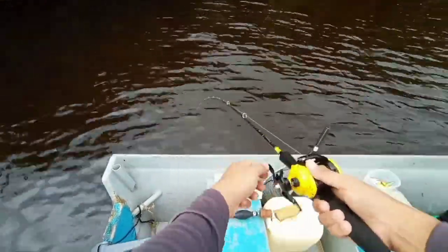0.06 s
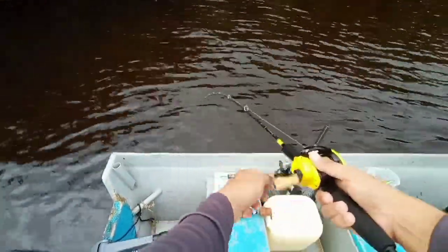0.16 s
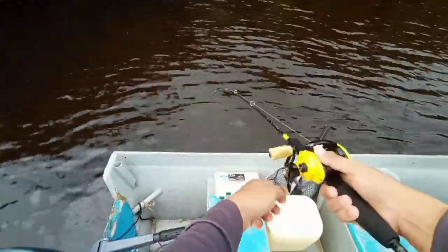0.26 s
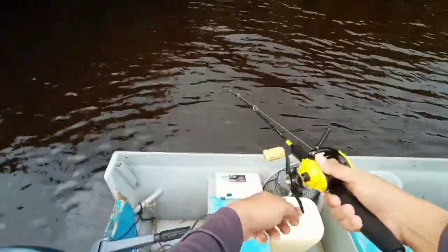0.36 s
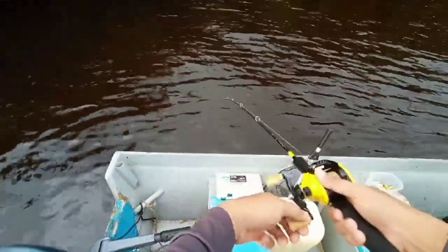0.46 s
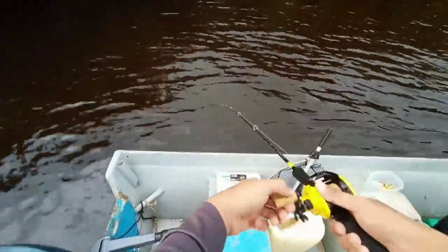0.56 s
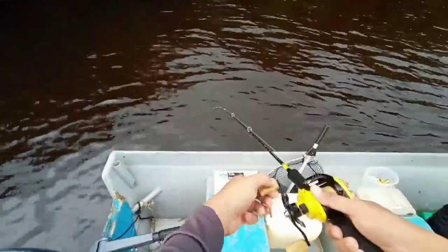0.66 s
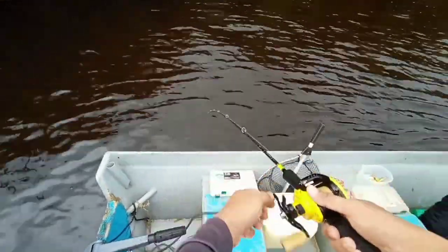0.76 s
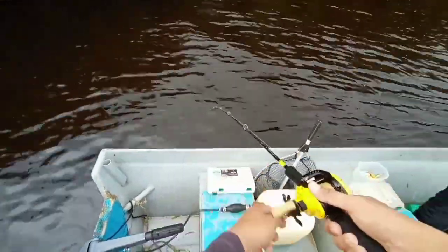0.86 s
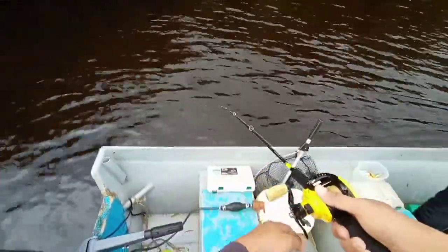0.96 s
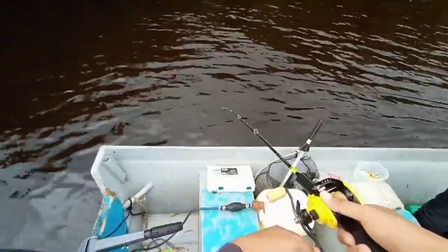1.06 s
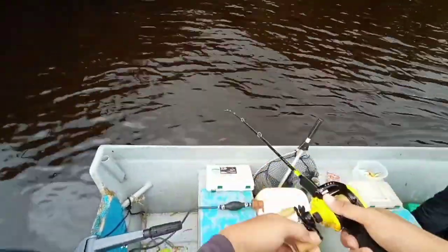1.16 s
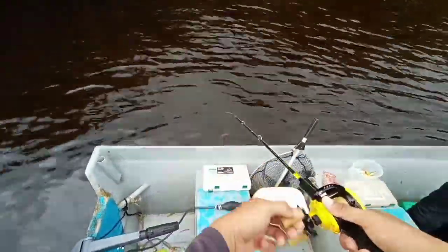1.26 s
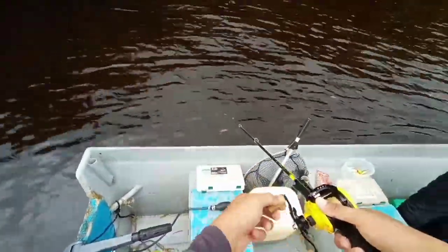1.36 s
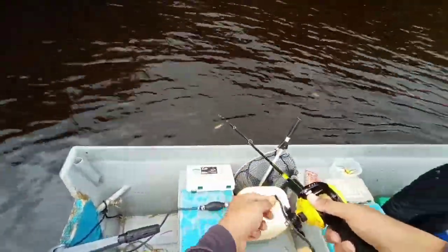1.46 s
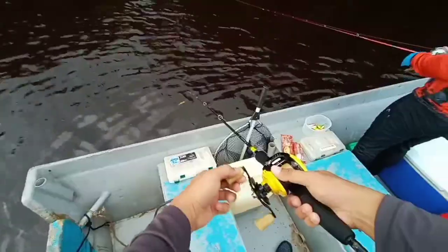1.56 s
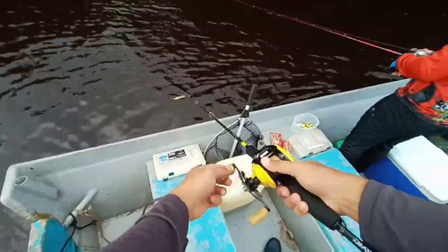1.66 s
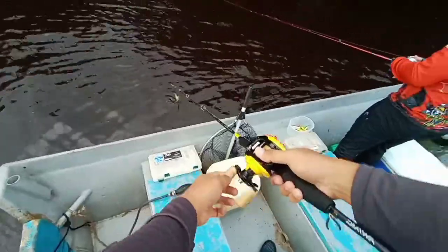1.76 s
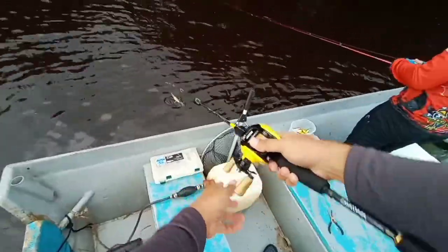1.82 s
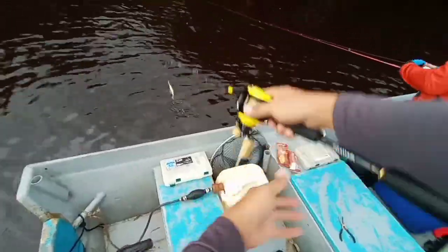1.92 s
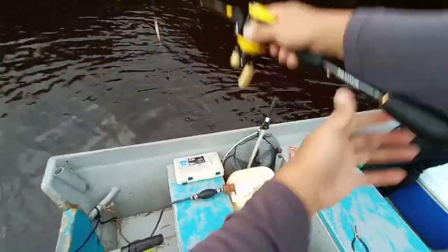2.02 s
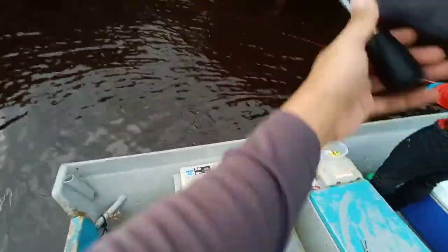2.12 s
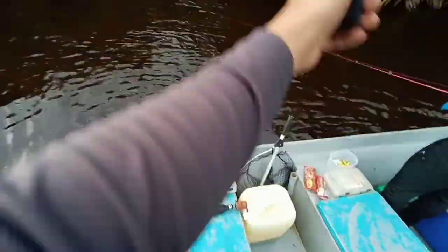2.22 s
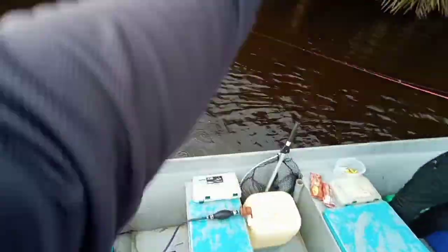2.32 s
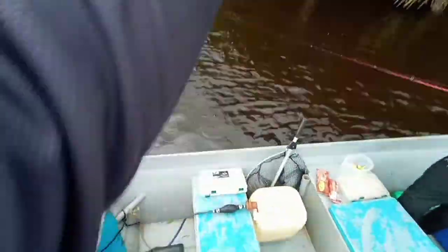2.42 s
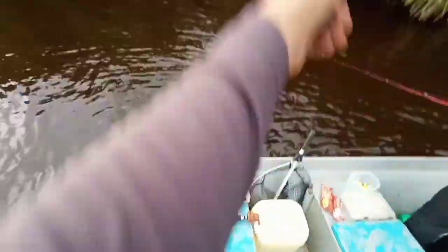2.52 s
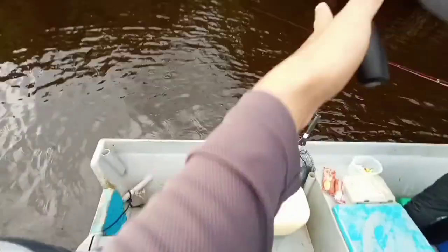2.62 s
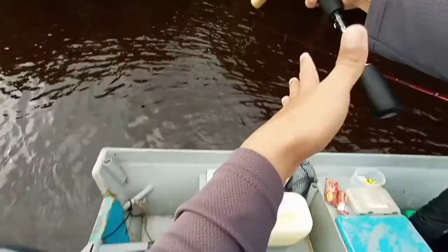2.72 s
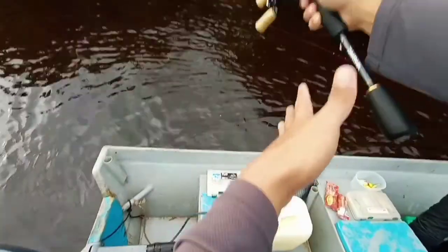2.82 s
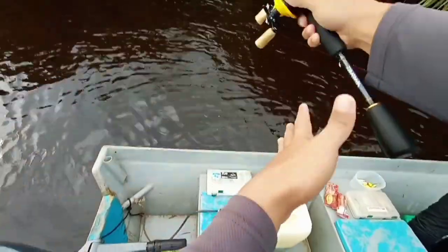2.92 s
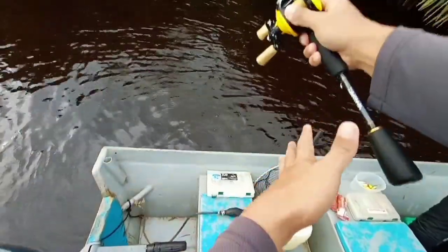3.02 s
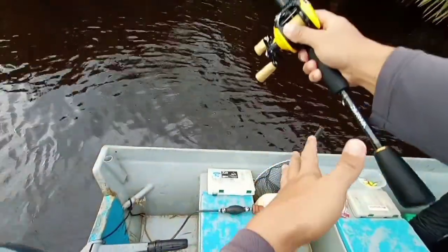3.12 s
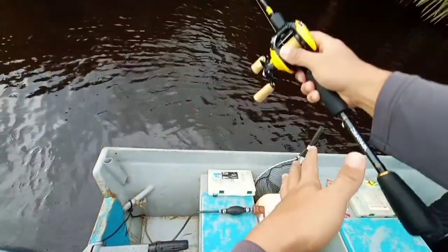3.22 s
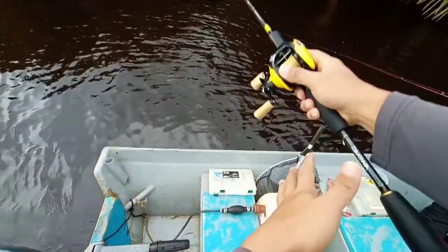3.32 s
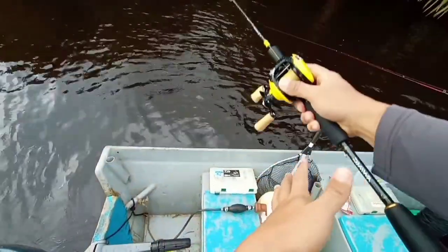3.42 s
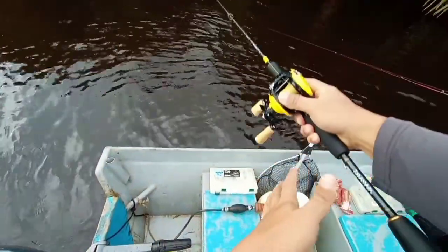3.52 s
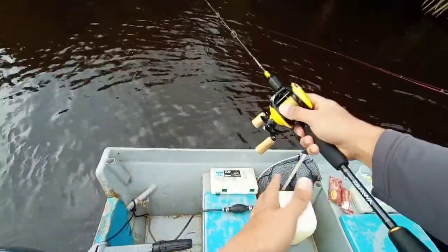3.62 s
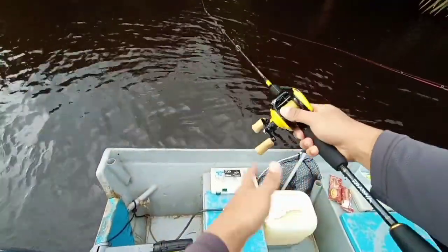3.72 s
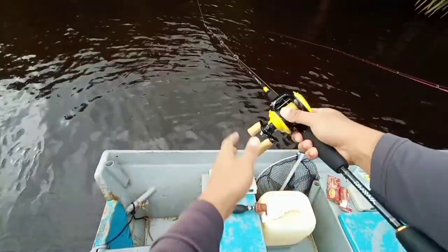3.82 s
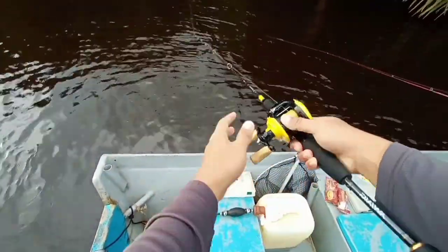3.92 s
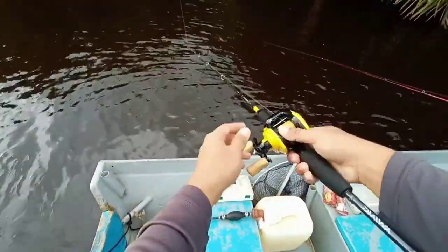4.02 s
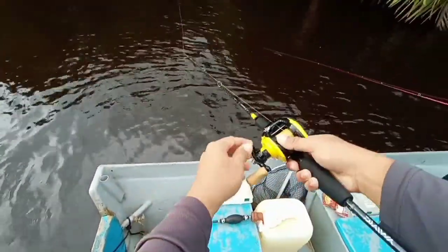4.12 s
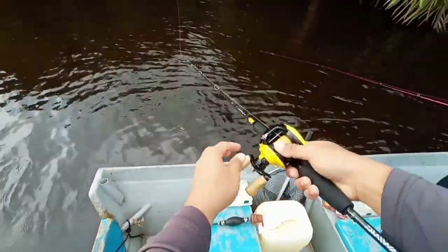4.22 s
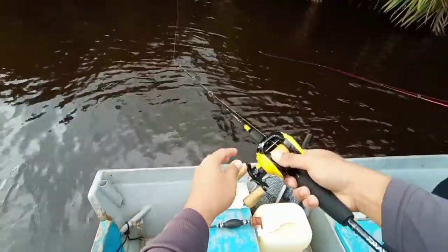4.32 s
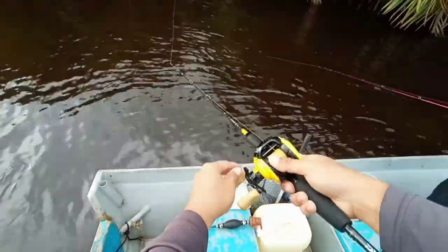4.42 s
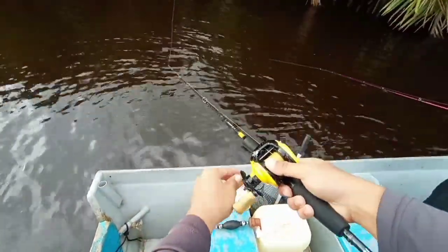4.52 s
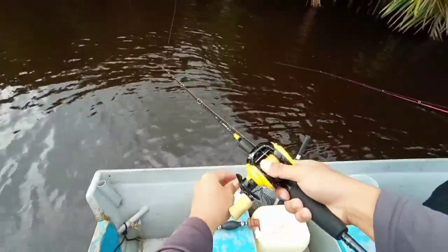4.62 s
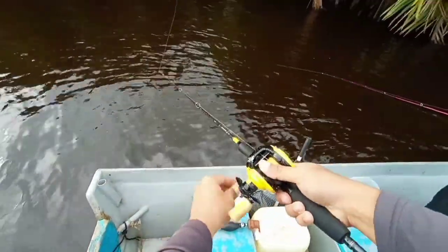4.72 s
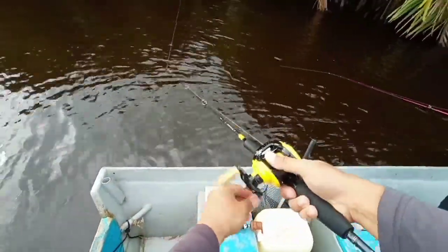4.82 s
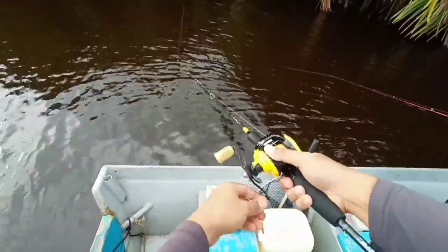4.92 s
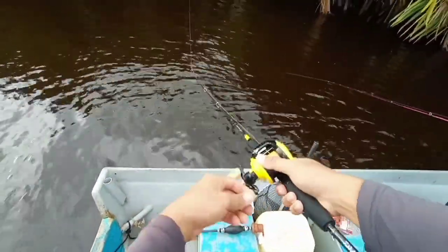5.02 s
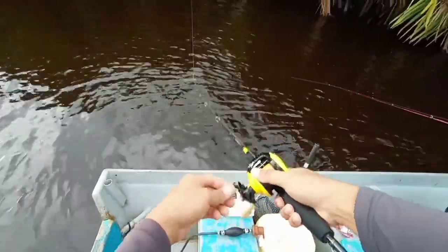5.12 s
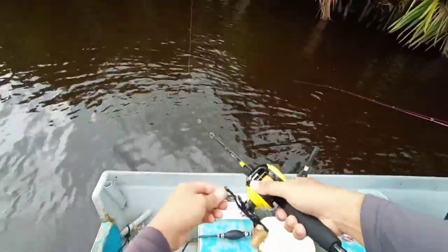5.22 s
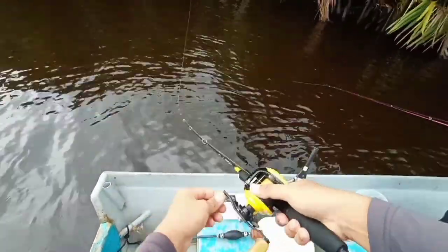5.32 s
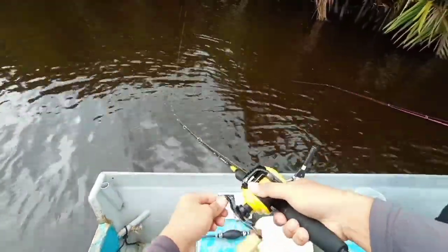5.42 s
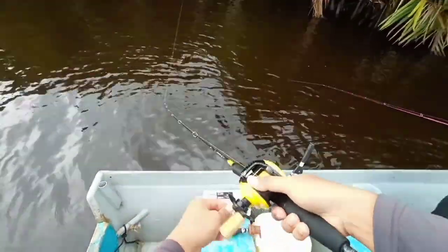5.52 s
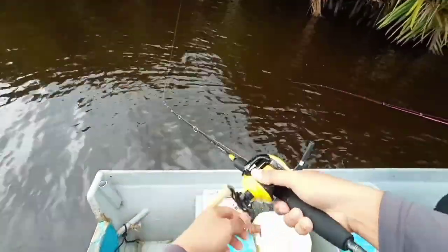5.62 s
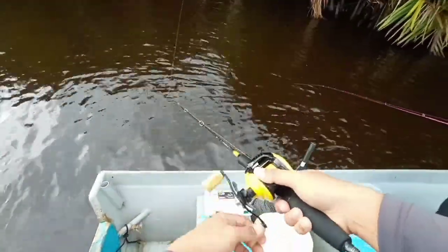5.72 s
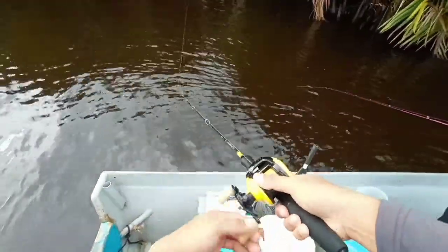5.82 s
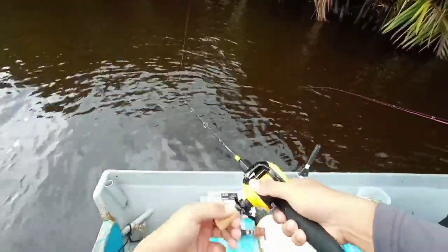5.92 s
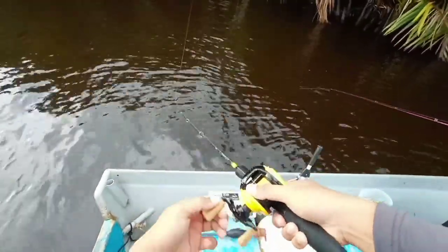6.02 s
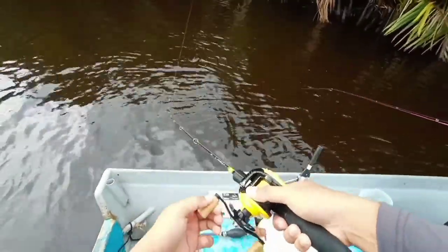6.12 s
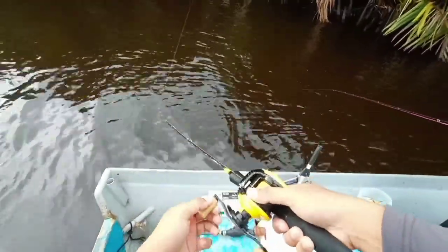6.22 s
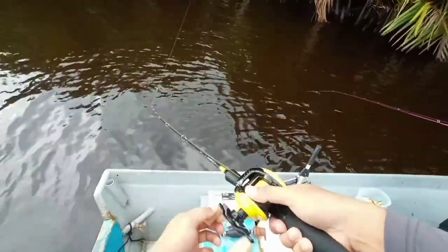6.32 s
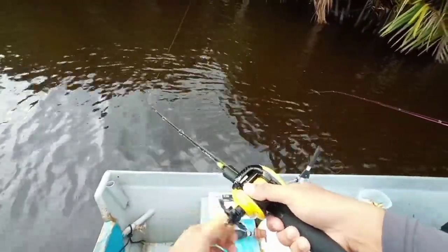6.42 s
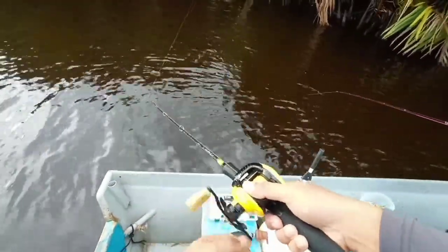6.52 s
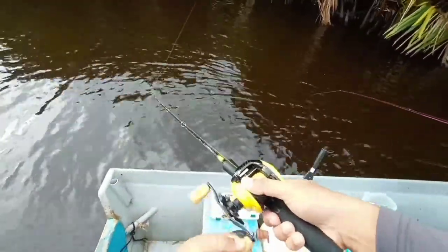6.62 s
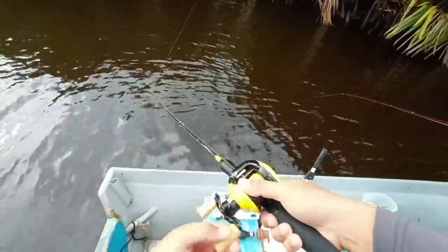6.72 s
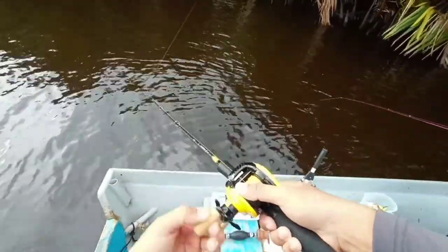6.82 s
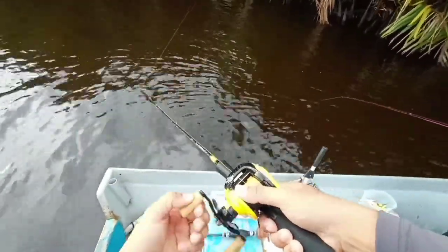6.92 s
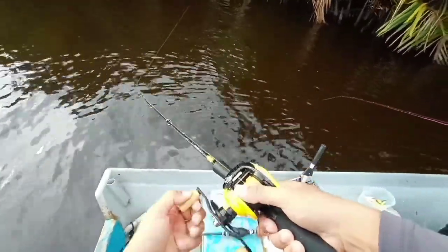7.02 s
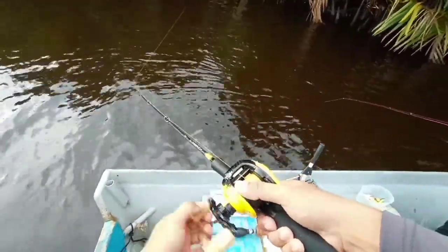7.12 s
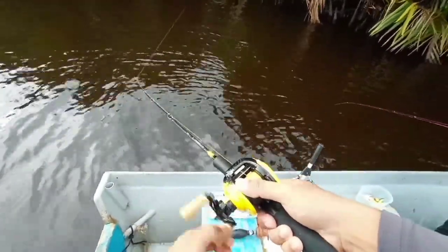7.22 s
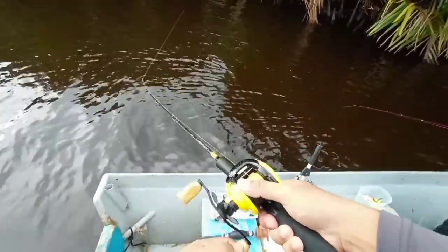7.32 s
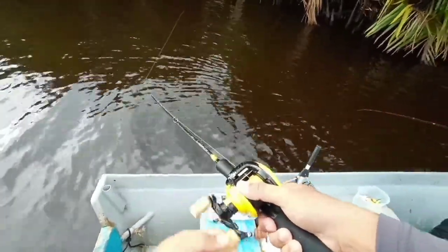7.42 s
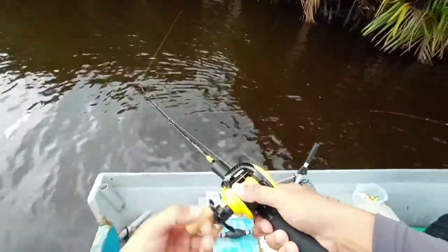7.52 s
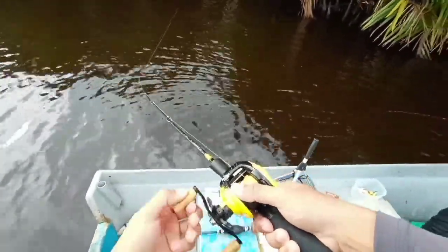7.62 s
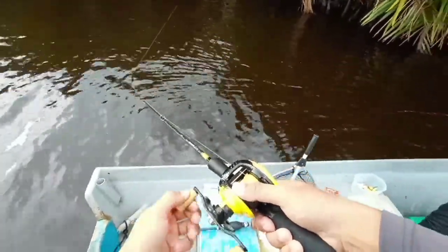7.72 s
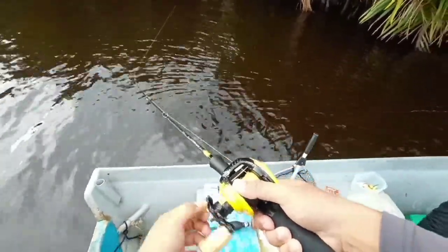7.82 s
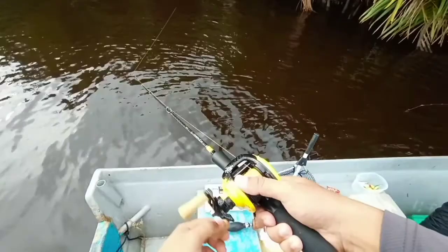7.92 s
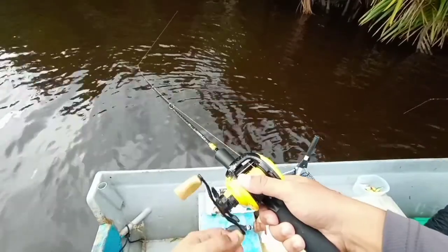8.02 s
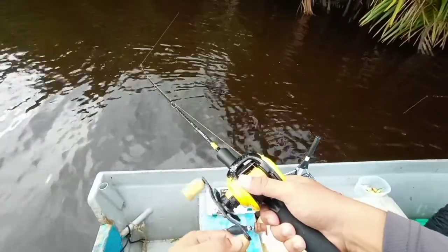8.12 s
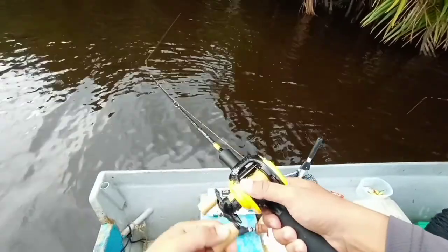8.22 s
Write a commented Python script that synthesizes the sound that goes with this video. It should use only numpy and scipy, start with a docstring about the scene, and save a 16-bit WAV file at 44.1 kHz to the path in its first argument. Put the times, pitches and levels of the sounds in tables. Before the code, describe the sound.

Geared reel purrs and clicks in the hands, line squeaking faintly. After a crisp release snap and soft rod swish, a hard rattle bursts into a high whine that falls away; a small wet plop follows. A pause, then a very loud metallic clack, and uneven winding with line hiss and thumps. Gentle water laps the hull outdoors.

```python
"""A baitcasting reel whirrs as an angler in a small aluminium boat winds, frees the spool, casts and winds again.
Gear teeth and rough line contacts shake the reel's resonances; the clutch snaps and the spool rattles and spins down.
Line hisses, sings and ticks in the guides, a sleeve brushes, and the lure plops into the river as tones and spray.
Dull knocks and lapping water sound in the hull. All is close to one small microphone."""
import sys
import numpy as np
from scipy import signal
from scipy.fft import rfft, irfft, next_fast_len
from scipy.io import wavfile
from scipy.ndimage import uniform_filter1d

SR = 44100
rng = np.random.default_rng(int(sys.argv[2]) if len(sys.argv) > 2 else 0)


def generate_wav(signal):
    """Clip the signal to [-1, 1] and save it as 16-bit WAV at the path in sys.argv[1]."""
    frames = np.transpose(np.atleast_2d(signal))
    scaled = np.clip(frames, -1, 1) * 32767
    pcm = np.round(scaled).astype(np.int16)
    wavfile.write(sys.argv[1], SR, pcm)


N = 364266
TIME = np.arange(N) / SR  # seconds
AGE = np.arange(SR // 3) / SR  # seconds since a blow

# All levels are relative settings; t60_s is the time to fade by 60 dB.
# open river air: pitch_hz, level_db
AIR_COLOUR = [(120, -38), (200, -14), (491, -7.5), (623, -24.5), (709, -12), (836, -19.5), (1250, -6),
              (1530, -18.5), (1840, -16), (4600, -19), (5520, -19), (7680, -29), (8270, -31.5),
              (10900, -31), (16000, -31.5)]
# hull and other deep rumbles: pitch_hz, level_db
HULL_COLOUR = [(25, -11), (45, -10), (70, -1), (135, 5), (200, 0.5), (330, -8), (450, -14), (800, -12.5),
               (1600, -39.5)]
# dull knocks through hand and hull: start_s, peak_db, pitch_hz, t60_s
KNOCKS = [(1.889, -35.5, 418, 0.081), (2.603, -36, 369.7, 0.17), (4.764, -31, 169.2, 0.054),
          (4.83, -32.5, 190, 0.12), (4.843, -32, 150, 0.057), (4.91, -40, 260, 0.19),
          (4.933, -38.5, 179, 0.14), (5.355, -44.5, 191, .09), (6.535, -43.5, 149, 0.1),
          (6.753, -20, 164, 0.03), (6.771, -15.5, 164, 0.018), (6.772, -31, 92, 0.044),
          (6.986, -33.5, 255, 0.13), (7.008, -23, 220, 0.0091), (7.145, -36, 160, 0.027),
          (8.193, -42, 151, 0.056), (8.245, -41, 112, .06)]
# water plops and slaps: start_s, peak_db, pitch_hz, t60_s
PLOPS = [(0.801, -39, 1225, 0.042), (1.44, -52, 453, 0.047), (1.887, -29.5, 548, 0.11),
         (2.216, -35, 1258, 0.066), (2.6, -25, 557, 0.078), (3.325, -52, 810, 0.075),
         (3.622, -47.5, 1258, 0.071), (3.65, -46.5, 1350, 0.095), (3.679, -30.5, 976, 0.033),
         (3.686, -34.5, 787, 0.13), (5.815, -44.5, 744, 0.04), (5.905, -45.5, 760, 0.058),
         (6.475, -43.5, 672, 0.12), (6.815, -46.5, 1310, 0.036), (7.11, -29.5, 606, 0.042),
         (7.127, -36.5, 385, 0.025)]
# the lure hits the river: start_s, peak_db, t60_s
SPLASHES = [(3.606, -47, 0.091), (3.614, -35.5, 0.23), (3.649, -43, 0.21), (3.683, -36, 0.12)]
# tone colour of the spray: pitch_hz, level_db
SPRAY_COLOUR = [(700, -4), (1300, -5), (2000, -15), (2800, 2), (3800, 3), (6000, -9.5), (7300, -5),
                (9000, -14.5), (13000, -21.5), (15000, -21)]
# tone colour of the sleeve: pitch_hz, level_db
CLOTH_COLOUR = [(300, -10), (1300, 1.5), (2600, -2.5), (3700, 7.5), (5400, 0), (6300, -4), (7200, -0.5),
                (9500, -7.5), (12500, -21), (15000, -17)]
# taut line sings: start_s, length_s, pitch_hz, glide_share_of_pitch, level_db
LINE_NOTES = [(2.09, 0.19, 10950, 0.01, -74), (2.26, 0.12, 11350, -0.06, -76),
              (2.25, 0.2, 9300, -0.16, -78)]
# line rubs on spool and level-wind: start_s, length_s, pitch_hz, glide_share_of_pitch, level_db
LINE_RUBS = [(0.0, 0.08, 2650, 0.063, -58), (0.11, 0.11, 2720, -0.02, -49.5),
             (0.12, 0.096, 860, -0.22, -49), (0.02, 0.203, 1870, -0.04, -56),
             (0.43, 0.16, 2270, -0.08, -57), (0.64, 0.14, 2370, 0.06, -61), (2.63, 0.28, 3100, -0.12, -57),
             (2.85, 0.3, 2650, -0.15, -61), (4.98, 0.52, 3650, 0.08, -57)]
# line running through the guides: pitch_hz, level_db
LINE_COLOUR = [(400, -3), (1200, -5), (2200, -5), (3600, -5.5), (5500, 0), (6300, -9), (7200, 1),
               (8300, -17), (11000, -11), (13000, -25.5), (15000, -7.5)]
# line and lure flick the guides, and the sleeve catches in sharp steps around 1.1-1.3 s: start_s, peak_db,
# ring_hz, t60_s
FLICKS = [(0.303, -36.5, 5900, 0.062), (1.127, -33.5, 6040, 0.047), (1.168, -32.5, 5800, 0.06),
          (1.238, -31.5, 4300, 0.09), (1.297, -29.5, 7350, 0.013), (1.5133, -34, 3180, 0.13),
          (1.881, -39, 7220, 0.06), (1.953, -51, 7230, 0.07), (2.6345, -27, 15400, 0.037),
          (4.022, -44, 6550, 0.16), (4.023, -45.5, 3160, 0.17), (4.159, -50.5, 10400, 0.039),
          (4.349, -56, 10800, 0.037), (4.535, -49, 10150, 0.045), (4.57, -51.5, 10300, 0.063),
          (6.791, -46, 7150, 0.034), (6.839, -52, 10200, 0.074), (7.882, -46, 14900, .05),
          (8.01, -50, 14900, .05)]
# line and lure patter against the guides: start_s, length_s, level_db
CHATTER = [(1.857, 0.1, -64), (3.15, 0.45, -75), (4.029, 0.47, -73), (4.45, 0.17, -66.5),
           (6.728, 0.1, -61.5), (7.023, 0.75, -67)]
# resonances of the metal guides: pitch_hz, width_hz, level_db
GUIDE_MODES = [(3720, 270, -2.5), (5700, 260, -0.5), (7170, 300, -0.5), (10400, 890, -7.5),
               (15000, 700, -9.5)]
# play in handle and gears: start_s, peak_db, treble_db, t60_s
TICKS = [(0.168, -47, -26, 0.16), (0.2895, -33, -34, 0.09), (0.3036, -34.5, -12, 0.048),
         (0.3139, -31, -31, 0.022), (0.409, -40, -14, 0.069), (0.4945, -36, -14, 0.05),
         (0.5144, -46, -28, 0.028), (0.623, -48.5, -32, 0.19), (0.779, -44.5, -18, 0.1),
         (0.7978, -41.5, -23, 0.028), (1.512, -39.5, -14, 0.15), (1.7006, -43, 4, 0.11),
         (1.7524, -46, -4, 0.06), (4.4363, -44.5, -16, 0.021), (4.589, -49, -13, 0.11),
         (5.3255, -50, -24, 0.19), (5.879, -53.5, 6, 0.2), (6.1753, -49.5, -9, 0.11),
         (7.4445, -45, -8, 0.092), (7.8101, -48, -20, 0.067), (8.0059, -37.5, -5, 0.06),
         (8.0167, -43.5, 10, 0.084)]
# spool rattles as the lure jerks it up to speed: start_s, peak_db, treble_db, t60_s
RATTLES = [(2.5133, -34, -9, 0.036), (2.518, -27.5, -4.5, 0.0096), (2.5352, -24, 7, 0.02),
           (2.5612, -15.5, -10, 0.011), (2.576, -25.5, -6.5, 0.034), (2.5875, -10.5, -35, 0.014),
           (2.5952, -12, -14.5, 0.023), (2.603, -20, -8, 0.027)]
# resonances of the spool: pitch_hz, width_hz, level_db
SPOOL_MODES = [(1280, 120, -12.5), (1757, 460, -11.5), (2618, 72.4, 6.5), (2820, 39.5, 7.5),
               (3000, 52, 4.5), (3035, 37, -3), (2870, 37, -5.5), (3240, 83, 6.5), (3600, 48, -2.5),
               (4100, 54, 2.5), (3960, 120, 4), (4670, 130, -18.5), (5700, 100, -7), (6700, 400, -16.5)]
# thumb bar frees the spool: start_s, peak_db, scatter_db, scatter_t60_s
THUMB_SNAPS = [(1.8345, -32.5, -23.5, 0.022), (1.8383, -8, -16, 0.049)]
# resonances of the thumb bar's snap: pitch_hz, width_hz, level_db
THUMB_MODES = [(594, 490, -11.5), (910, 200, -2), (1242, 127, 1), (2460, 750, -10.5), (3480, 400, -5),
               (3880, 340, -7), (4570, 130, -6), (5580, 420, -8), (7250, 260, -7.5), (8740, 280, -10.5),
               (9820, 480, -15), (12820, 810, -22), (15400, 620, -24)]
# clutch drops back into gear: start_s, peak_db, scatter_db, scatter_t60_s
CLUTCH_SNAPS = [(4.7358, -37, -7, 0.051), (4.7518, -18.5, -27, .02), (4.7582, 1.5, -28.5, 0.041)]
# resonances of the clutch's snap: pitch_hz, width_hz, level_db
CLUTCH_MODES = [(750, 220, -7.5), (1180, 260, -5), (2315, 180, -2), (3340, 500, -5.5), (4150, 610, -8.5),
                (4860, 660, -7), (5560, 360, -5), (6760, 420, -3), (7035, 500, -1), (7820, 300, -19),
                (9400, 290, -21.5), (11430, 1200, -32.5), (14900, 600, -20)]
# spool speed, heard as the pitch of its whine: time_s, pitch_hz
SPOOL_SPEED = [(2.52, 15600), (2.76, 15200), (3.0, 10300), (3.15, 7400), (3.229, 5400), (3.42, 3900)]
# spells of turning the handle: start_s, length_s, gear_db, line_hiss_db, hand_rumble_db
WINDING = [(-0.05, 0.58, -60, -91, -62), (0.562, 0.23, -76, -92, -64), (0.967, 0.483, -66.5, -73, -79),
           (1.465, 0.19, -61, -62, -72), (1.686, 0.16, -70, -74, -67.5), (4.776, 0.3, -58.5, -86, -64.5),
           (5.08, 0.32, -57, -78, -63), (5.594, 0.35, -61.5, -90.5, -60), (6.035, 0.38, -65.5, -86, -62),
           (6.427, 0.27, -62, -91.5, -58.5), (6.723, 0.17, -60, -67.5, -54.5),
           (6.963, 0.29, -56.5, -68, -53.5), (7.257, 0.47, -57, -74, -56), (7.745, 0.51, -62, -77, -60)]
# resonances of the reel body: pitch_hz, width_hz, level_db
GEAR_MODES = [(731, 81, 1.5), (980, 170, -9), (1251, 33, 5), (1577, 190, -5), (1970, 50, -0.5),
              (2152, 78.8, -0.5), (2635, 340, -5), (3194, 270, -2.5), (3674, 100, 2), (4203, 86, -5),
              (4610, 280, -10), (5660, 150, -7), (6950, 83, -18), (10530, 230, -30.5)]


def undb(db):
    """Decibels to gain."""
    return 10 ** (np.asarray(db) / 20)


def unit(x):
    """Scale to an average strength (rms) of 1."""
    return x / np.sqrt(np.mean(x ** 2))


def fade(t60):
    """Exponential decay after a blow, down 60 dB after t60 seconds."""
    return np.exp(-np.log(1000) * AGE / max(t60, 1e-3))


def onset(rise_s):
    """Soft start of a contact."""
    return 1 - np.exp(-(AGE / rise_s) ** 2)


def gesture(start_s, length_s, attack_s, release_s):
    """Gain of a movement: it rises smoothly, holds to the end of its length and dies away."""
    rise = np.sin(np.pi / 2 * np.clip((TIME - start_s) / attack_s, 0, 1)) ** 2
    return rise * np.exp(-np.clip((TIME - start_s - length_s) / release_s, 0, 20))


def walk(rate_hz, size=N):
    """Smooth random drift with an rms of 1."""
    step = int(SR / rate_hz)
    levels = np.repeat(rng.standard_normal(size // step + 1), step)
    return unit(uniform_filter1d(levels, step)[:size])


def hiss(size=N):
    """Plain white noise."""
    return rng.standard_normal(size)


def grit(contacts_per_s, spread_db):
    """Tiny contacts at random moments, of uneven size and either sign; rms 1."""
    hits = (rng.random(N) < contacts_per_s / SR) * rng.choice([-1, 1], N)
    return unit(hits * undb(spread_db * np.clip(hiss(), -2, 2)))


def band(x, hz, width):
    """One resonance, gain 1 at its centre."""
    b, a = signal.iirpeak(min(hz, SR * .45), hz / min(width, SR / 5), fs=SR)
    return signal.lfilter(b, a, x)


def double_band(x, hz, width):
    """The same resonance twice, for steeper sides."""
    return band(band(x, hz, width), hz, width)


def ring(x, modes):
    """A body's resonances; every second one swings in opposite phase."""
    return sum((-1) ** k * undb(db) * band(x, hz, width) for k, (hz, width, db) in enumerate(modes))


def colour(x, points):
    """Shape a sound by a smooth spectrum; rms 1."""
    hz, db = np.transpose(points)
    size = next_fast_len(len(x))
    log_f = np.log(np.arange(size // 2 + 1) * SR / size + 1)
    gain = undb(np.interp(log_f, np.log(hz), db))
    return unit(irfft(rfft(x, size) * gain, size)[:len(x)])


def add(out, start_s, peak_db, sound):
    """Place a sound at its time and peak level."""
    i = int(start_s * SR)
    out[i:i + len(sound)] += (undb(peak_db) * sound / np.abs(sound).max())[:N - i]


def whine(pitch, blur_hz, octave_db):
    """A tone and its octave along a pitch track, blurred by flutter."""
    phase, size = 2 * np.pi * np.cumsum(pitch) / SR, len(pitch)
    tone = np.sin(phase) * walk(blur_hz, size) + np.cos(phase) * walk(blur_hz, size)
    octave = (pitch < SR / 4) * np.sin(2 * phase) * walk(2 * blur_hz, size)
    return tone + undb(octave_db) * octave


def river(lap_db=-65, air_db=-70.5):
    """Ripples drum softly on the hull under faint open air."""
    hull = colour(hiss(), HULL_COLOUR) * undb(lap_db + 0.61 * walk(3) + 2 * walk(36))
    return hull + undb(air_db + 0.72 * walk(1.2)) * colour(hiss(), AIR_COLOUR)


def boat(near, scatter_db=-34, t60=.05):
    """Sounds sit in the centre; faint scatter off the hull and a trace of air differ between the ears."""
    echoes = band(hiss(len(AGE)) * fade(t60), 600, 2500)
    side = undb(scatter_db) * signal.fftconvolve(near, echoes / np.linalg.norm(echoes))[:N]
    side += undb(-77) * colour(hiss(), AIR_COLOUR) + undb(-86) * colour(hiss(), HULL_COLOUR)
    return near + np.array([side, -side])


def thuds(rows, rise_s, glide, rough, width):
    """A soft push sets one damped, gliding resonance swinging, with a ragged wash around it."""
    out = np.zeros(N)
    for start_s, peak_db, hz, t60 in rows:
        phase = 2 * np.pi * hz * np.cumsum(1 + glide * (1 - fade(t60))) / SR
        wash = unit(double_band(hiss(len(AGE)), hz, hz * width))
        add(out, start_s, peak_db, (np.sin(phase) + rough * wash) * fade(t60) * onset(rise_s))
    return out


def splash(rise_s=0.0026):
    """Spray thrown up by the lure patters back as fading noise."""
    out = np.zeros(N)
    for start_s, peak_db, t60 in SPLASHES:
        add(out, start_s, peak_db, colour(hiss(len(AGE)), SPRAY_COLOUR) * fade(t60) * onset(rise_s))
    return out


def swing(centre_hz=2300, width_hz=2200, level_db=-69):
    """Rod and arm swish softly through the air before the cast."""
    air = unit(double_band(hiss(), centre_hz, width_hz))
    return undb(level_db) * air * gesture(2.05, 0.2, attack_s=0.15, release_s=.16)


def sleeve(swish_db=-46, rumble_db=-49):
    """Cloth threads slide over each other while the arm's weight rumbles underneath."""
    stroke = gesture(0.98, 0.373, attack_s=0.3, release_s=0.016)
    press = gesture(1.098, 0.18, attack_s=0.093, release_s=0.039)  # hardest in mid-stroke
    swish = undb(swish_db) * colour(grit(19000, 1.8), CLOTH_COLOUR) * stroke
    return swish + undb(rumble_db) * colour(hiss(), HULL_COLOUR) * press


def notes(rows, blur_hz, octave_db, bend):
    """Line tightens and slackens: each note swells in one arch, gliding and bending up with the tension."""
    out = np.zeros(N)
    for start_s, length_s, hz, glide, db in rows:
        progress = np.clip(TIME[:SR] / length_s, 0, 1)
        tension = np.sin(np.pi * progress)
        pitch = hz * (1 + glide * (progress - .5) + bend * tension)
        i = max(int(start_s * SR), 0)
        out[i:i + SR] += (undb(db) * tension * whine(pitch, blur_hz, octave_db))[:N - i]
    return out


def sing(high_db=-1, hum_hz=324, hum_db=-62.5):
    """Taut line sings thin and high on the backswing, then hums low as it takes up the lure's drag."""
    high = undb(high_db) * notes(LINE_NOTES, 70, -20, .015) * undb(3 * walk(25))
    hum = whine(np.full(N, float(hum_hz)), 50, -17) * gesture(4.8, 0.49, attack_s=.06, release_s=0.058)
    return high + undb(hum_db) * hum


def rubs():
    """Line sticks and slips as it runs across the spool, a blurred note with a flickering level."""
    return notes(LINE_RUBS, 650, -35.5, 0.01012) * undb(-3 + 3.61 * walk(70))


def flicks(width_hz=2200, edge_db=-30):
    """Thin, high ticks from the rod guides and the sleeve's sharper steps: fading noise through one resonance."""
    out = np.zeros(N)
    for start_s, peak_db, hz, t60 in FLICKS:
        force = hiss(len(AGE)) * fade(t60)
        add(out, start_s, peak_db, double_band(force, hz, width_hz) + undb(edge_db) * force)
    return out


def chatter(contacts_per_s=700, cluster_db=4.5):
    """Line and lure patter against the guides in small, bright clusters."""
    patter = unit(ring(grit(contacts_per_s, 4.5) * undb(cluster_db * walk(25)), GUIDE_MODES))
    return patter * sum(undb(db) * gesture(start_s, length_s, 0.034, .03) for start_s, length_s, db in CHATTER)


def shudder(rumble_db=-46, rattle_db=-52.5, rattle_hz=900, rattle_width_hz=1100, t60=1):
    """The jolt of the gears catching dies away in the rod as a rumble and a light rattle."""
    rattle = unit(double_band(grit(900, 4), rattle_hz, rattle_width_hz))
    body = undb(rumble_db) * colour(hiss(), HULL_COLOUR) + undb(rattle_db) * rattle
    return body * gesture(4.77, 0.035, attack_s=0.013, release_s=t60 / np.log(1000))


def clatter(rows, modes, treble_hz, treble_width, rise_s):
    """Loose parts scrape briefly: the body rings under a bright metal edge."""
    out = np.zeros(N)
    for start_s, peak_db, treble_db, t60 in rows:
        force = hiss(len(AGE)) * (fade(t60) + 2 * fade(t60 / 8)) * onset(rise_s)
        edge = undb(treble_db) * unit(band(force, treble_hz, treble_width))
        add(out, start_s, peak_db, unit(ring(force, modes)) + edge)
    return out


def snaps(rows, modes, bounce_s, bounce, echo_s, crack_db):
    """A sprung part cracks against its stop and bounces once; the boat's floor scatters the crack back."""
    out = np.zeros(N)
    lag = int(echo_s * SR)
    for start_s, peak_db, scatter_db, t60 in rows:
        force = undb(crack_db) * hiss(len(AGE)) * fade(0.0065)
        force[0] += 1
        force[int(bounce_s * SR)] += bounce
        scatter = undb(scatter_db) * hiss(len(AGE)) * fade(t60)
        force[lag:] += scatter[:-lag]
        add(out, start_s, peak_db, ring(force, modes))
    return out


def cast(body_db=-7, spool_db=-10, line_db=-3, guide_db=-7, whirr_db=-54, jerk_db=-43, whine_db=-72.5):
    """Line peels off and shakes reel and guides; whine falls and whirr fades as the spool slows."""
    cast_s, whirr_power = 2.5, 2.0  # the whirr grows as a power of speed
    hz = np.interp(TIME, *np.transpose(SPOOL_SPEED))
    flight = gesture(cast_s, 0.796, attack_s=0.029, release_s=0.062)
    jerk = gesture(cast_s, 0.13, attack_s=.035, release_s=0.0175)
    shake = grit(5000, 3)
    whirr = undb(body_db) * unit(ring(shake, GEAR_MODES))
    whirr += undb(spool_db) * unit(ring(shake, SPOOL_MODES))
    whirr += undb(line_db) * colour(grit(5970, 1.9), LINE_COLOUR)
    whirr += undb(guide_db) * unit(ring(grit(6000, 3), GUIDE_MODES))
    whirr *= undb(whirr_db) * flight * (hz / hz.max()) ** whirr_power + undb(jerk_db) * jerk
    # the whine swells as it sweeps through a resonance of the reel housing
    housing_hz, housing_width_hz, housing_db = 6316, 1800, 10.5
    housing = 1 / (1 + ((hz - housing_hz) / housing_width_hz) ** 2)
    spin = whine(hz * (1 + .012 * walk(90)), 1100, -5.5)
    spin *= undb(whine_db + housing_db * housing + 3.5 * walk(40))
    return spin * (flight + undb(9.5) * jerk) + whirr * undb(1.6 * walk(40))


def winding(gear_boost_db=1, line_boost_db=5, rumble_boost_db=1, tooth_hz=210, grit_db=-1, wander_db=3.5):
    """Gear teeth mesh at an uneven pace, stirring wandering resonances; wet line hisses in the guides."""
    teeth = np.cumsum(tooth_hz * (1 + .09 * walk(9) + .05 * walk(300))) / SR
    mesh = np.diff(np.floor(teeth), prepend=0) * undb(1.7 * walk(400))  # one click per tooth
    force = unit(mesh) + undb(grit_db) * grit(1800, 4.6)
    gears = np.zeros(N)
    for k, (hz, width, db) in enumerate(GEAR_MODES):
        gears += (-1) ** k * band(force, hz, width) * undb(db + wander_db * walk(16))
    gears = unit(gears) * undb(gear_boost_db + 3 * walk(45))
    line = colour(grit(6000, 2.9), LINE_COLOUR) * undb(line_boost_db + 6 * walk(60))
    rumble = colour(hiss(), HULL_COLOUR) * undb(rumble_boost_db + 3.04 * walk(30))
    out = np.zeros(N)
    for start_s, length_s, gear_db, line_db, rumble_db in WINDING:
        sound = gears * undb(gear_db) + line * undb(line_db) + rumble * undb(rumble_db)
        out += gesture(start_s, length_s, attack_s=0.052, release_s=0.04) * sound
    return out


def scene():
    """Reel, line and sleeve in the hands; water and hull around them."""
    water = thuds(PLOPS, rise_s=0.0031, glide=.03, rough=0.4, width=0.33) + splash() + river()
    knocks = thuds(KNOCKS, rise_s=0.0018, glide=-0.14, rough=0.54, width=0.53)
    arm = swing() + sleeve()
    line = sing() + rubs() + flicks() + chatter()
    reel = snaps(THUMB_SNAPS, THUMB_MODES, bounce_s=.0008, bounce=0.85, echo_s=.003, crack_db=-0.5)
    reel += snaps(CLUTCH_SNAPS, CLUTCH_MODES, bounce_s=.0005, bounce=.9, echo_s=.004, crack_db=-13.5)
    reel += clatter(TICKS, GEAR_MODES, treble_hz=4500, treble_width=3200, rise_s=0.0023)
    reel += clatter(RATTLES, SPOOL_MODES, treble_hz=5500, treble_width=2000, rise_s=0.00066)
    reel += shudder() + cast() + winding()
    return boat(water + knocks + arm + line + reel)


def record(dry, top_hz=15500):
    """The microphone loses the deepest bass and the very top, and the hardest snap just overloads it."""
    thin = signal.sosfilt(signal.butter(4, 64, "high", fs=SR, output="sos"), dry)
    clipped = np.clip(thin, -.85, .85)
    return signal.sosfilt(signal.ellip(10, .2, 90, top_hz, fs=SR, output="sos"), clipped)


dry = scene()
out = record(dry)
generate_wav(out)
```